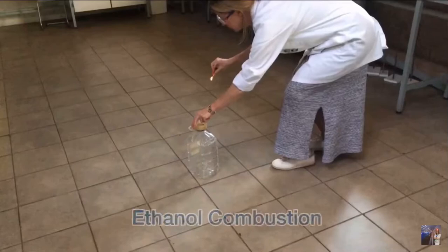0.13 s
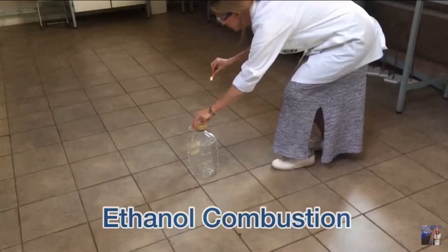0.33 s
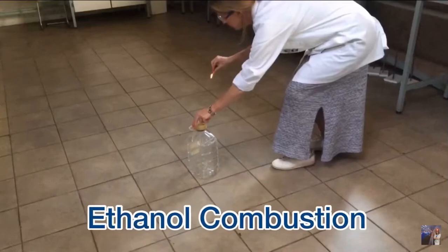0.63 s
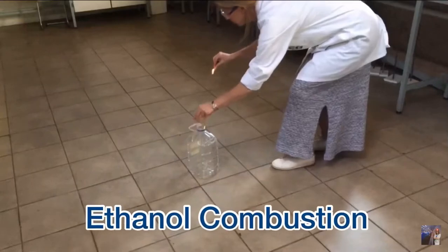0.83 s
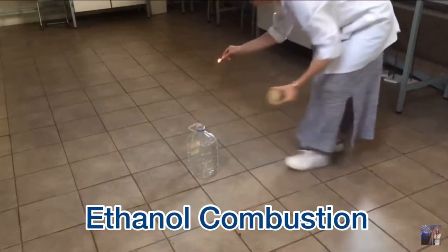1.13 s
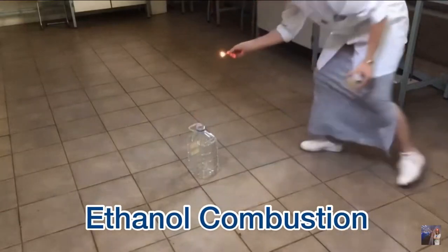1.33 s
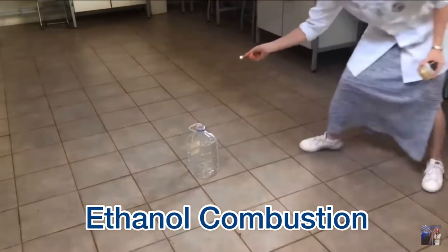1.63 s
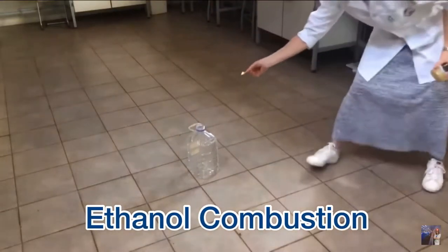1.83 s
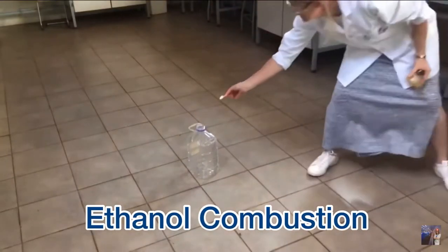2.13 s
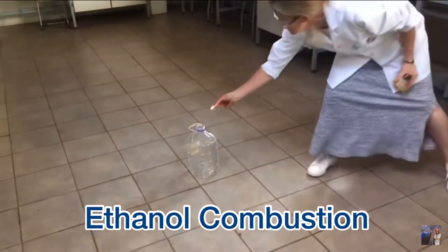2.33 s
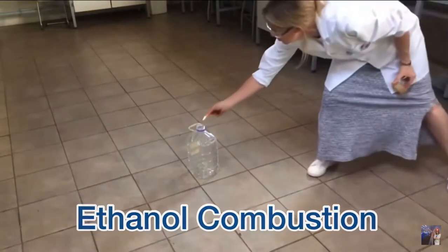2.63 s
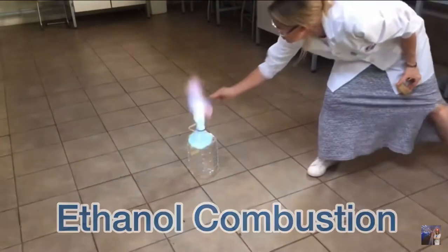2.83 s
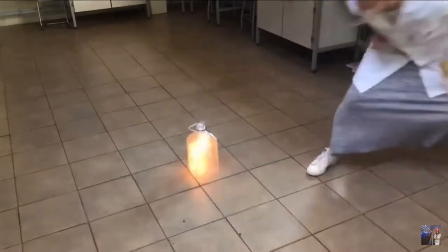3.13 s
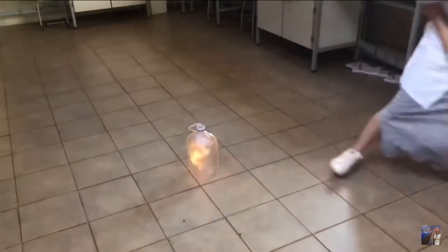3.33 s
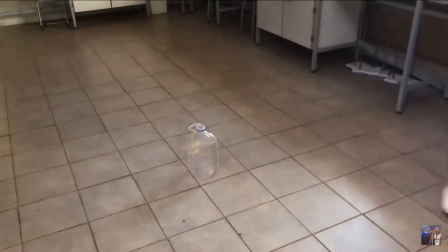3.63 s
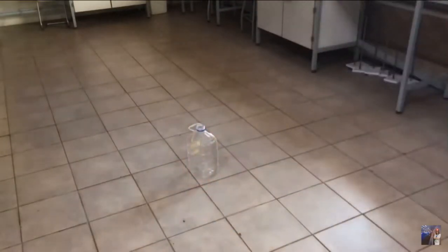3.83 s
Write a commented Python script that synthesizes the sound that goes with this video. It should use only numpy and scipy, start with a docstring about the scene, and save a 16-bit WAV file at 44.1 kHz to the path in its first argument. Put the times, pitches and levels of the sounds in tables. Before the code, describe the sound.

A loud, low whoosh as vapour ignites in a big glass bottle in an echoing room

```python
"""Ventilation noise, thin hums and a wavering drone open the scene in a large, tiled, echoing room.
Soft shoes step, scuff and squeak (damped sines, rubbed noise); clothes rustle (grainy noise).
A stopper pops out of a big glass bottle, as a set of short ringing modes. Then the vapour, lit by a match,
roars out of the neck for a quarter second: resonant noise, hiss, a low boom and sudden puffs.
All but the background rings on in a diffuse echo with standing waves."""
import sys
import numpy as np
from scipy import signal
from scipy.fft import rfft, irfft
from scipy.io import wavfile

SR = 44100
rng = np.random.default_rng(int(sys.argv[2]) if len(sys.argv) > 2 else 0)


def transcribe(signal):
    """Save signal, clipped to [-1, 1], as a 16-bit WAV file at the path in sys.argv[1]."""
    frames = np.atleast_2d(signal).T
    limited = np.clip(frames, -1, 1)
    pcm = np.round(limited * 32767).astype(np.int16)
    wavfile.write(sys.argv[1], SR, pcm)


N = 176400
T = np.arange(N) / SR   # seconds


def amp(db):
    """Decibels to linear gain."""
    return 10 ** (np.asarray(db) / 20)


def rms_one(x):
    """Scale a signal to an rms of 1."""
    return x / np.sqrt(np.mean(x ** 2) + 1e-20)


def in_time(rows):
    """Draw each level column as straight lines over time, -120 dB outside the rows."""
    seconds, *columns = np.transpose(rows)
    return [np.interp(T, seconds, column, left=-120, right=-120) for column in columns]


def at_hz(points, hz):
    """Read a curve at the given frequencies, with straight lines over log frequency."""
    curve_hz, values = np.array(points).T[:2]
    return np.interp(np.log(hz), np.log(curve_hz), values)


def coloured(spectrum):
    """Noise with the given spectrum, rms 1."""
    hz = np.maximum(np.arange(N // 2 + 1) * SR / N, 1)
    white = rng.standard_normal(N)
    return rms_one(irfft(rfft(white) * amp(at_hz(spectrum, hz)), N))


def resonant(peaks, count=1):
    """Noise through parallel resonances, each applied count times; a peak's dB is its rms level."""
    out, white = 0, rng.standard_normal(N)
    for k, (hz, width_hz, db) in enumerate(peaks):
        radius = np.exp(-np.pi * width_hz / SR)
        section = [1, 0, -1, 1, -2 * radius * np.cos(2 * np.pi * hz / SR), radius ** 2]
        band = rms_one(signal.sosfilt([section] * count, white))
        out = out + (-1) ** k * amp(db) * band   # neighbours in opposite polarity
    return out


def drift(rate_hz):
    """Random wandering below about rate_hz, spread 1: noise through a two-pole lowpass."""
    pole = np.exp(-2 * np.pi * rate_hz / SR)
    white = rng.standard_normal(N + SR)
    settled = signal.lfilter([1], [1, -2 * pole, pole ** 2], white)[SR:]
    return rms_one(settled)


def ring(start_s, hz, t60, swell, sag=0):
    """A damped sine that swells in over some cycles while its pitch sags to hz from (1 + sag) times hz."""
    cycles = hz * np.maximum(T - start_s, 0)
    rise = 1 - np.exp(-cycles / swell)
    tone = np.sin(2 * np.pi * (cycles + sag * swell * rise))
    return rise ** 2 * tone * amp(-60 * cycles / hz / t60)


# Colour of the ventilation. Each row: frequency in Hz, relative level in dB per Hz.
VENT_SPECTRUM = [(15, -61), (25, -19), (37, -3.5), (198, -3.5), (240, -1.5), (399, -3.5), (567, -8.5),
                 (782, -16.5), (1200, -14), (2010, -22), (15500, -38)]
# Thin wavering hums. Each row: frequency in Hz, width in Hz, level in dB.
HUMS = [(95.5, 32, -68), (247, 14, -74), (449, 60, -69.5)]
# The drone's swells and dips. Each row: time in seconds, level in dB.
DRONE_LEVEL = [(.17, -68), (.3, -63.5), (.47, -75), (.65, -70.5), (1.2, -78), (2.2, -76), (2.45, -65.5),
               (2.8, -69.5), (4.0, -85)]
# Tones inside the drone. Each row: frequency in Hz, width in Hz, level in dB relative to the swell.
DRONE_TONES = [(586, 17, 1), (706, 26, -6.5), (828, 14, -10), (1213, 16, -13.5)]
VENT_DB = -63.5


def background():
    """Gently wavering coloured noise for moving air; narrow noise bands for the hums and the drone."""
    ventilation = amp(VENT_DB + 0.4 * drift(5.3)) * coloured(VENT_SPECTRUM)
    drone = amp(in_time(DRONE_LEVEL)[0]) * resonant(DRONE_TONES)
    return ventilation + resonant(HUMS) + drone


# Footfalls and small knocks. Each row: start in seconds, strength in dB, pitch in Hz,
# ring in cycles to -60 dB, share by which the pitch starts high.
FOOTFALLS = [(.297, -54, 4850, 6.5, .1), (.356, -47, 3780, 7.8, .1), (1.062, -66, 161, 7, 0.083),
             (1.161, -48, 150, 9.7, .1), (1.392, -42, 121, 4.6, .1), (1.27, -52, 126, 17, 0.11),
             (1.4855, -25, 387, 7.1, 3.2), (1.488, -30.5, 220, 3.6, 0.29), (1.4931, -40, 1220, 18, 0.87),
             (1.899, -28.5, 603, 5.8, 2.6), (1.901, -27, 192, 3.8, 0.35), (2.022, -35, 1090, 7.9, 0.72),
             (2.058, -36.5, 740, 13, 0.68), (2.0697, -33, 1994, 12.0, .1), (2.077, -20.5, 1700, 3.7, 0.059),
             (2.093, -54, 590, 1.4, .4), (2.301, -48, 171.6, 6.0, 0.057), (2.852, -35, 1310, 6.6, .4)]
STEP_SWELL = 0.65   # cycles to full swing
TICK_HZ, TICK_DB, TICK_T60_S = 2200, -14.5, 0.0022   # tick level is relative to its step


def steps():
    """Short soft thuds of sagging pitch; the hard edge of the sole lands first as a quick tick."""
    out = 0
    for start_s, db, hz, cycles, sag in FOOTFALLS:
        thud = ring(start_s, hz, cycles / hz, STEP_SWELL, sag)
        tick = ring(start_s, TICK_HZ, TICK_T60_S, swell=.4)
        out = out + amp(db) * (thud + amp(TICK_DB) * tick)
    return out


# Tugs as the stopper leaves the neck. Each row: start in seconds, strength in dB.
TUGS = [(0.736, -47), (0.7764, -23)]
# Ringing modes of the bottle. Each row: frequency in Hz, level in dB relative to the tug,
# decay to -60 dB in seconds.
BOTTLE_MODES = [(159.3, -23, 0.23), (336.5, 0, 0.049), (423, -2.5, 0.041), (667, -14.5, 0.039),
                (880, -11.5, 0.038), (940, -14, 0.061), (1490, -17, 0.027), (1735, -16.5, 0.022),
                (1990, -18, 0.019), (2800, -20, 0.007), (3400, -19.5, 0.0058), (5200, -29, .003)]
POP_SWELL = 1.52   # cycles to full swing


def stopper():
    """Each tug sets the air and glass of the bottle ringing in damped modes."""
    out = 0
    for start_s, tug_db in TUGS:
        for hz, mode_db, t60 in BOTTLE_MODES:
            out = out + amp(tug_db + mode_db) * ring(start_s, hz, t60, POP_SWELL)
    return out


# Soles and cloth rubbing. Each row: time in seconds, dry level in dB before the 2 dB trim.
RUSTLE_LEVEL = [(0.9, -89), (0.94, -80), (1.04, -66.5), (1.35, -76), (1.51, -69), (1.55, -65.5),
                (1.57, -72), (1.81, -78), (1.82, -68.5), (1.92, -71.5), (1.96, -56.5), (1.97, -57),
                (2.3, -74.5), (2.6, -76.5), (2.62, -70.5), (2.68, -78), (2.84, -67.5), (2.85, -58.5),
                (2.87, -60), (2.9, -88)]
# Colour of the rubbing. Each row: frequency in Hz, relative level in dB per Hz.
RUSTLE_SPECTRUM = [(710, -24), (1200, -14.5), (1780, -6), (1940, -12.5), (3730, -13.5), (4430, -14.5),
                   (5980, -15.5), (15500, -23)]
RUSTLE_TRIM_DB = -2.0


def rustle():
    """Rubbing noise made grainy by a fast random wobble of its level."""
    level_db, = in_time(RUSTLE_LEVEL)
    return amp(level_db + RUSTLE_TRIM_DB + 1.26 * drift(120)) * coloured(RUSTLE_SPECTRUM)


# A sole drags. Each row: time in seconds, dry level in dB.
SCRAPE_LEVEL = [(2.055, -75), (2.075, -48), (2.12, -65.5), (2.18, -60.5), (2.26, -61)]
# Resonances of the sole. Each row: frequency in Hz, width in Hz, level in dB relative to the drag.
SOLE_RESONANCES = [(2110, 760, -7.5), (696, 670, -5.5)]


def scrape():
    """Rough rubber on tile: grainy noise in the sole's resonances."""
    level_db, = in_time(SCRAPE_LEVEL)
    return amp(level_db + 3.5 * drift(120)) * resonant(SOLE_RESONANCES, count=2)


# Low boom of the jet. Each row: time in seconds, dry level in dB.
BOOM_LEVEL = [(2.87, -68), (2.92, -45), (2.95, -33.5), (3.0, -34.5), (3.1, -41), (3.2, -41), (3.3, -58),
              (3.45, -51)]
BOOM_HZ, BOOM_WIDTH_HZ = 76.7, 46


def boom():
    """The whole volume of gas heaves: one low band of resonant noise."""
    level_db, = in_time(BOOM_LEVEL)
    return amp(level_db) * resonant([(BOOM_HZ, BOOM_WIDTH_HZ, 0)], count=2)


# The burning jet, dry. Each row: time in seconds, neck roar in dB, jet hiss in dB, body rumble in dB.
JET_LEVELS = [(2.88, -76, -68, -75), (2.9, -46, -59.5, -52), (2.93, -42, -51, -39.5),
              (2.955, -28.5, -37, -30.5), (2.985, -20, -25.5, -25), (3.01, -13.5, -19, -25),
              (3.05, -14, -17.5, -22), (3.085, -13, -15, -21), (3.12, -24.5, -20, -23),
              (3.16, -23, -23.5, -18), (3.22, -32.5, -60, -48), (3.3, -45, -42, -46), (3.45, -60, -64, -84)]
# Air resonances of the neck. Each row: frequency in Hz, width in Hz, relative level in dB.
NECK_RESONANCES = [(587, 220, 3.5), (794, 200, 1.5), (941, 144, 1.5), (1378, 83, -4.5), (1620, 320, -2.5)]
# Resonances of the bottle's body. Each row: frequency in Hz, width in Hz, relative level in dB.
BODY_RESONANCES = [(121.4, 26, -6), (201.4, 15, -0.5), (280.5, 65, 1.5), (370, 91, 4.5), (480, 68, 0)]
# Colour of the hiss. Each row: frequency in Hz, relative level in dB per Hz.
HISS_SPECTRUM = [(470, -16), (800, -10), (1120, -2.5), (1680, -5.5), (1880, -4.5), (2030, -4.5), (2540, -7),
                 (4160, -14), (15500, -27.5)]
FLUTTER_DB, FLUTTER_HZ = 1, 61


def jet():
    """Turbulent burning excites neck and body of the bottle; the jet hisses above; all three flutter together."""
    roar_db, hiss_db, rumble_db = in_time(JET_LEVELS)
    roar = amp(roar_db) * rms_one(resonant(NECK_RESONANCES, count=2))
    hiss = amp(hiss_db) * coloured(HISS_SPECTRUM)
    rumble = amp(rumble_db) * rms_one(resonant(BODY_RESONANCES))
    return (roar + hiss + rumble) * amp(FLUTTER_DB * drift(FLUTTER_HZ))


# The flame front catches in sudden puffs. Each row: start in seconds, strength in dB, pitch in Hz.
FLAME_PUFFS = [(2.9, -45, 303), (2.948, -8, 564), (3.0, -15, 714), (3.032, 11.5, 746), (3.066, -8, 806),
               (3.12, -12, 582)]
PUFF_CYCLES, PUFF_SWELL = 8.0, 0.97   # cycles to -60 dB, cycles to full swing


def puffs():
    """Short pressure kicks in the neck: damped sines whose pitch starts high."""
    out = 0
    for start_s, db, hz in FLAME_PUFFS:
        out = out + amp(db) * ring(start_s, hz, PUFF_CYCLES / hz, PUFF_SWELL, sag=0.77)
    return out


SQUEAK_S, SQUEAK_HZ, SQUEAK_SAG_HZ_PER_S, SQUEAK_DB = 3.93, 8150, 6000, -76


def squeak():
    """A thin falling squeak of a sole: a gliding sine with a rough level."""
    t = np.maximum(T - SQUEAK_S, 0)
    onset = np.minimum(t / .005, 1)
    tone = np.sin(2 * np.pi * (SQUEAK_HZ - .5 * SQUEAK_SAG_HZ_PER_S * t) * t)
    return amp(SQUEAK_DB + 2.7 * drift(60)) * onset * tone


# Decay of the room. Each row: frequency in Hz, time to fall 60 dB in seconds.
ROOM_DECAY = [(60, 1.47), (170, 1.3), (350, 1.45), (700, 1.444), (1100, 1.665), (2000, 1.394), (4000, 1.39),
              (6000, 1.01), (8500, 0.77), (12000, 0.31)]
# Standing waves that stand out of the echo. Each row: frequency in Hz, level in dB before the echo gain,
# decay to -60 dB in seconds.
STANDING_WAVES = [(70.8, -56, 1.1), (163.2, -55, 1.41), (205, -57.5, 0.97), (261.3, -52, 0.81),
                  (316.6, -57, 1.45), (386.6, -56, 1.52), (470.2, -55, 0.79), (573.4, -53.5, 0.89),
                  (617, -57, 1.25), (657, -57.5, 1.17), (745.5, -58, 0.74), (991.6, -56.5, 1.4),
                  (1136, -55, 1.75), (1368.2, -54, 1.63)]
ECHO_DB, ECHO_GAP_S, ECHO_BUILD_S = -1, 0.012, 0.0027


def room(x):
    """Diffuse echo: third-octave noise bands, each dying at its own rate, stronger the longer it lasts."""
    t = T[:2 * SR]
    edges = 30 * 2 ** np.arange(0, 9.6, 1 / 3)
    white = rng.standard_normal((2, len(t)))   # neighbouring bands use different noise
    build = 1 - np.exp(-np.maximum(t - ECHO_GAP_S, 0) / ECHO_BUILD_S)
    tail = 0
    for k, (low, high) in enumerate(zip(edges, edges[1:])):
        t60 = at_hz(ROOM_DECAY, np.sqrt(low * high))
        bandpass = signal.butter(2, [low, min(high, .49 * SR)], "band", fs=SR, output="sos")
        band = signal.sosfilt(bandpass, white[k % 2])
        decaying = rms_one(band * build * amp(-60 * t / t60))
        tail = tail + decaying * np.sqrt(t60 * (high - low) / SR / SR)
    turns = rng.random(len(STANDING_WAVES))   # random starting phases
    for (hz, db, t60), turn in zip(STANDING_WAVES, turns):
        tail = tail + amp(db - 60 * t / t60) * np.sin(2 * np.pi * (hz * t + turn))
    return x + amp(ECHO_DB) * signal.fftconvolve(x, tail)[:N]


def scene():
    """Send the near sounds through the room and lay the background under them."""
    feet_and_cloth = steps() + rustle() + scrape() + squeak()
    bottle = stopper() + boom() + jet() + puffs()
    return (room(feet_and_cloth + bottle) + background())[None]


START_S, FADE_IN_S = .173, 0.0011   # silence before the start
MIC_LOW_HZ, CUTOFF_HZ = 55, 15950


def record(dry):
    """The deep bass is lost, the sound cuts in, peaks are rounded, the top is cut."""
    bass_cut = signal.butter(2, MIC_LOW_HZ, "high", fs=SR, output="sos")
    top_cut = signal.cheby2(20, 70, CUTOFF_HZ, fs=SR, output="sos")
    cut_in = np.clip((T - START_S) / FADE_IN_S, 0, 1)
    rounded = np.tanh(signal.sosfilt(bass_cut, dry) * cut_in)
    return signal.sosfilt(top_cut, rounded)


dry = scene()
out = record(dry)
transcribe(out)
```